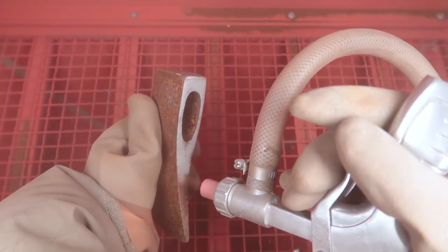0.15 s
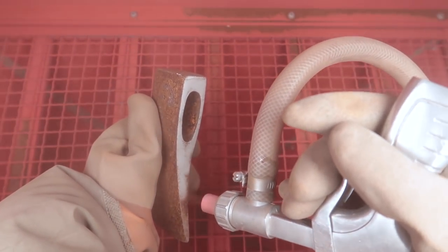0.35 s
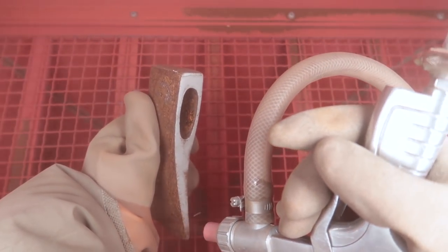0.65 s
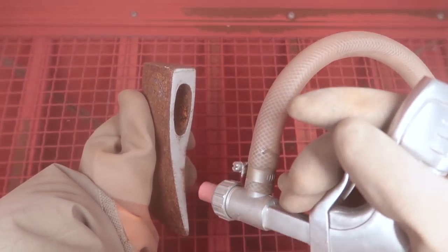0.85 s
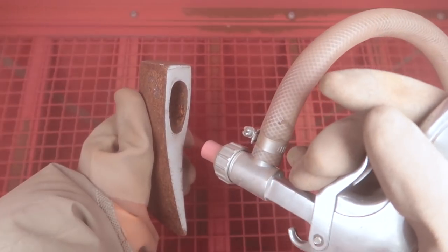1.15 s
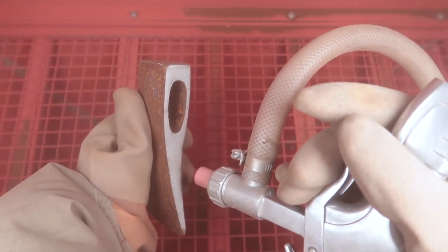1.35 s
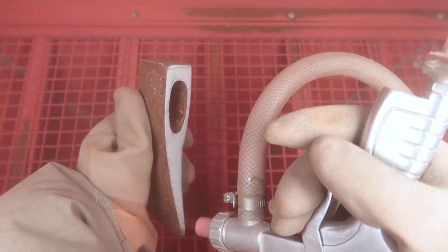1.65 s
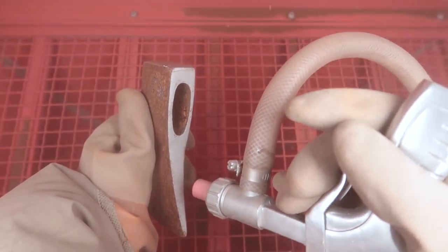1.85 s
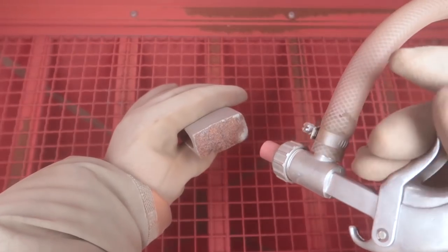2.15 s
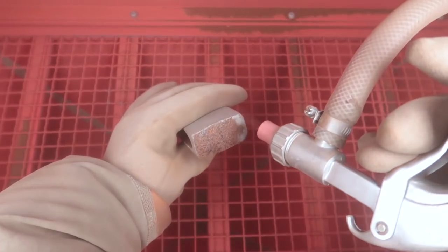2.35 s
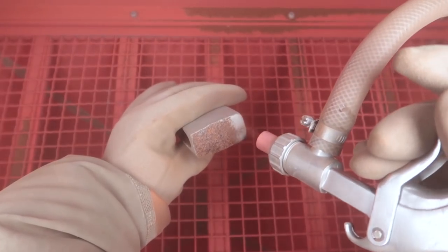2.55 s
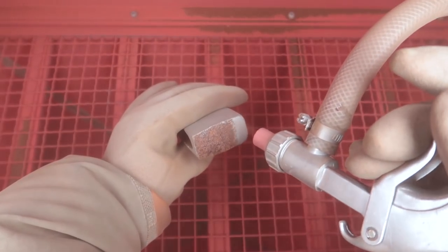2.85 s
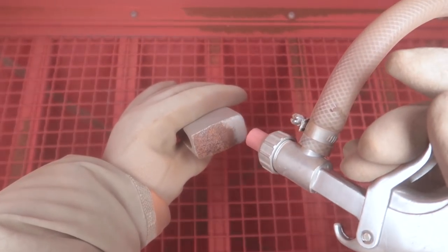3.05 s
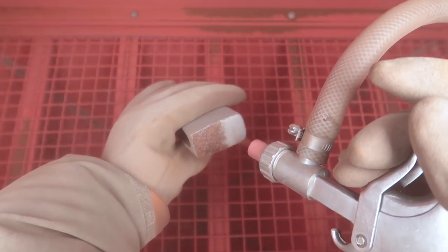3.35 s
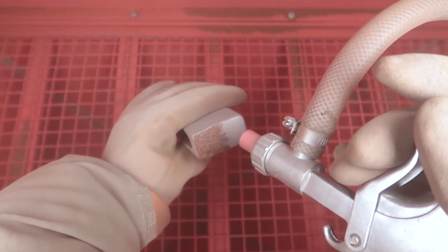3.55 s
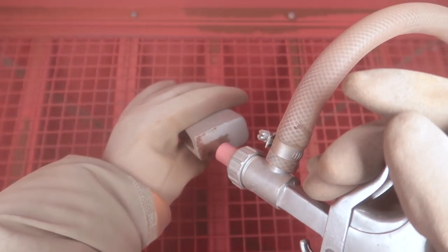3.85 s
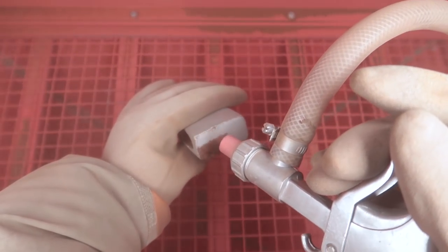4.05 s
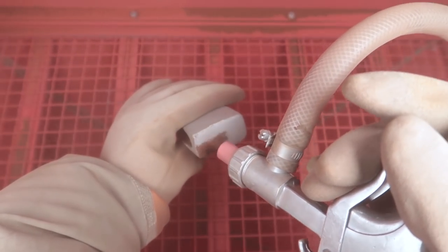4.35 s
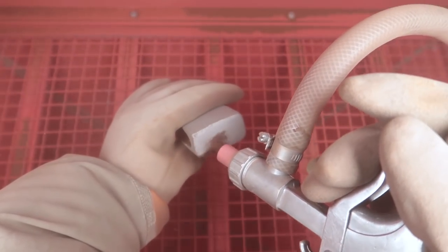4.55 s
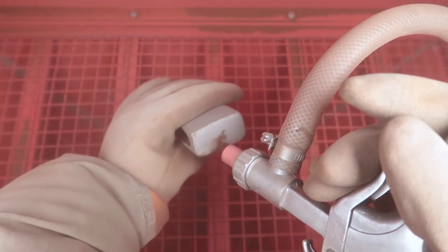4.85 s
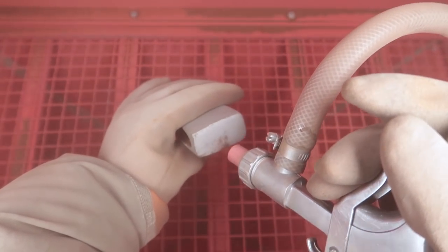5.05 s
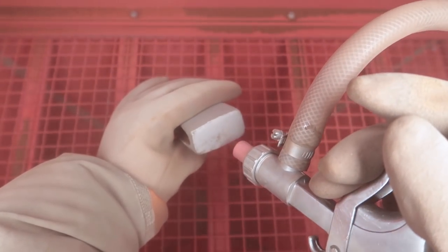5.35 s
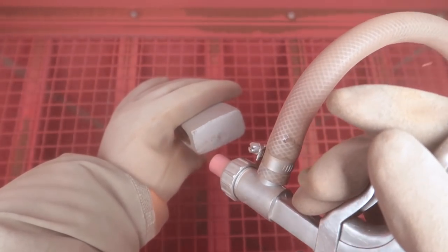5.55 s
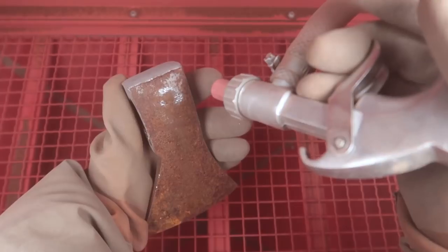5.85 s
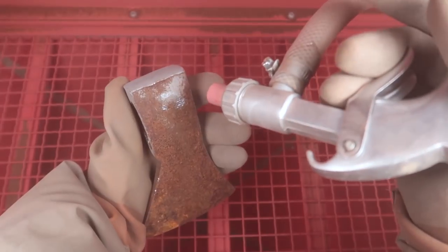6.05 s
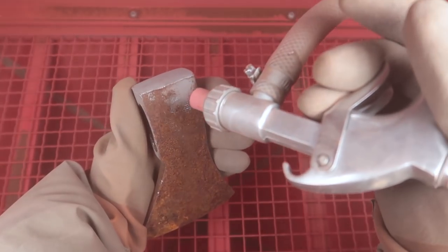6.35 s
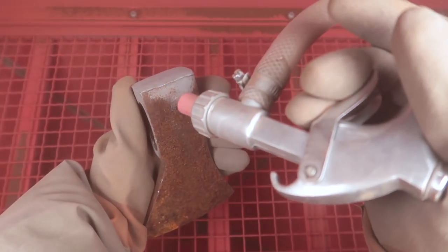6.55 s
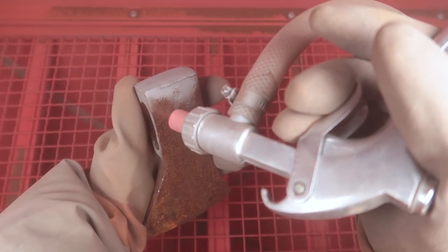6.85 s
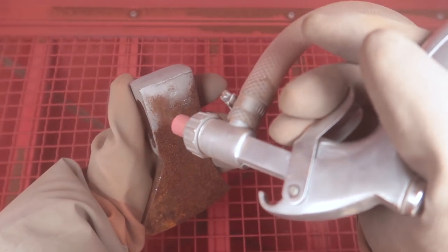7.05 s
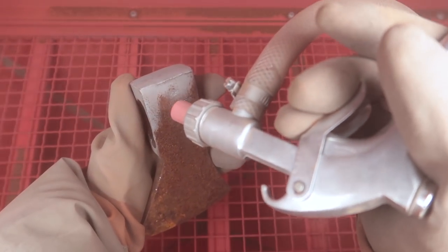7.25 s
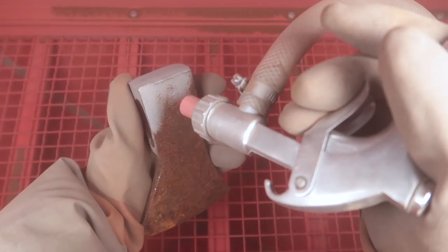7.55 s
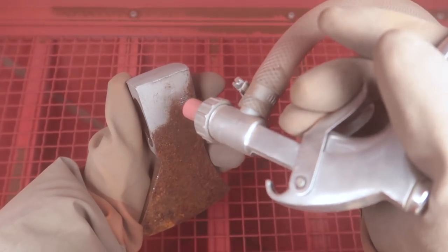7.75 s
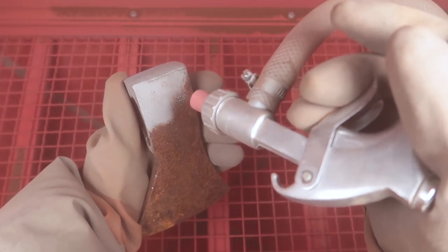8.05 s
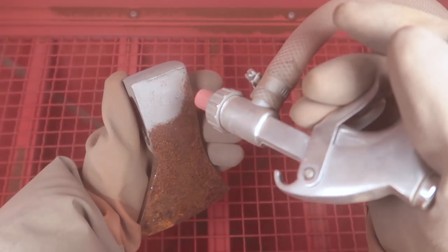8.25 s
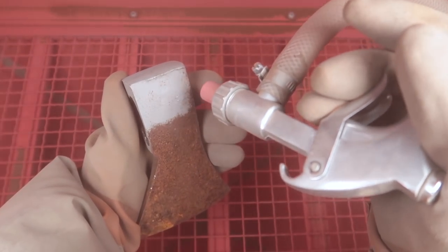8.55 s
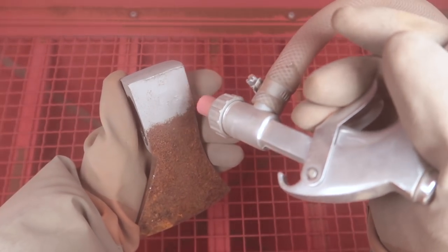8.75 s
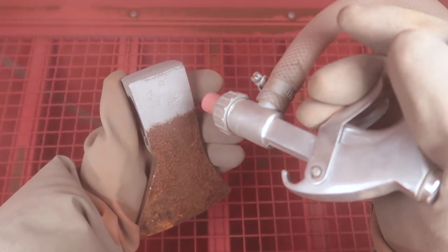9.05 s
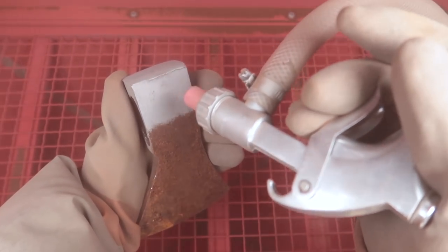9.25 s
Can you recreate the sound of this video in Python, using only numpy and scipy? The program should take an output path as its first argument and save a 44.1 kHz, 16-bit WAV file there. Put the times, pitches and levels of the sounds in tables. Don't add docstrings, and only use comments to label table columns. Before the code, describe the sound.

A blasting gun hisses steadily in a metal cabinet over a humming compressor and thin extractor whine, dropping slightly in level past the middle.

```python
import sys
import numpy as np
from scipy import signal
from scipy.fft import rfft, irfft, next_fast_len
from scipy.io import wavfile

SR = 44100
rng = np.random.default_rng(int(sys.argv[2]) if len(sys.argv) > 2 else 0)


def elevation(decibels):
    levels = np.asarray(decibels, float)
    return 10 ** (levels / 20)


def transcribe(u):
    v = np.clip(np.atleast_2d(u).T, -1, 1)
    q = np.round(v * 32767).astype(np.int16)
    wavfile.write(sys.argv[1], SR, q)


N = 414981
TIME_S = np.arange(N) / SR
SIZE = next_fast_len(N)
HZ = np.maximum(np.arange(SIZE // 2 + 1) * SR / SIZE, 1)


def in_time(rows):
    s, *columns = np.transpose(rows)
    return [np.interp(TIME_S, s, column) for column in columns]


def at_hz(points, hz):
    table_hz, table_db = np.array(points).T
    return np.interp(np.log(hz), np.log(table_hz), table_db)


def drift(rate_hz):
    every = 40
    r = np.exp(-2 * np.pi * every * rate_hz / SR)
    noise = rng.standard_normal(N // every + 2002)
    slow = signal.lfilter([1], [1, -2 * r, r * r], noise)[2000:]
    return np.interp(np.arange(N) / every, np.arange(len(slow)), slow / slow.std())


def swell(s, half_s):
    return np.exp(-np.abs((TIME_S - s) / half_s) ** 3)


def peak(hz, width_hz):
    return 1 / (1 + (2 * (HZ - hz) / width_hz) ** 2)


def through(hz, top):
    top_hz, width_hz, top_db = top
    return top_db - 10 * np.log10(1 + (2 * (hz - top_hz) / width_hz) ** 2)


def slope(hz, order):
    return 1 / (1 + (hz / HZ) ** order)


def resonant(base, modes):
    lift = sum(elevation(2 * db) * peak(hz, width_hz) for hz, width_hz, db in modes)
    return elevation(2 * at_hz(base, HZ)) * (1 + lift)


def dense_modes(ripple_db, spacing_hz):
    knots = np.arange(0, SR / 2, spacing_hz)
    ripple = np.interp(HZ, knots, rng.standard_normal(len(knots)))
    return elevation(2 * ripple_db * ripple)


def lead(seconds):
    return np.exp(1j * np.pi * HZ * seconds * np.array([[-1], [1]]))


def stereo_noise(power):
    # pitch_hz, side_minus_mid_db
    unlike = [(60, -60), (240, -60), (330, -32), (800, -27), (1150, -17), (1300, -18), (1450, -45),
              (2000, -40), (2300, -11), (4000, -15), (5200, -12.5), (6000, -18), (7000, -13), (13000, -2)]
    mid, side = rfft(rng.standard_normal((2, SIZE))) * np.sqrt(power * SR / 2)
    shared = mid * lead(9e-6)
    unshared = elevation(at_hz(unlike, HZ)) * side * [[1], [-1]]
    return irfft(shared + unshared, SIZE)[:, :N]


def tone(turns, level_db, wobble_db):
    level = np.sqrt(2) * elevation(level_db + wobble_db * drift(0.89))
    return level * np.cos(2 * np.pi * turns)


def workshop():
    # start_s, pitch_hz, level_db
    far_motor = [(0, 181, -95), (3.2, 180, -90), (3.5, 178, -72), (4.0, 172, -70), (4.3, 150.1, -64),
                 (4.55, 138, -74), (4.8, 130, -95), (9.41, 130, -95)]
    # start_s, peak_db
    bumps = [
        (2.2, -66),
        (5.02, -70),
        (6.0, -68),
    ]
    hz, level_db = in_time(far_motor)
    out = tone(np.cumsum(hz) / SR, level_db, wobble_db=6.0)
    age = np.arange(SR // 4) / SR
    thump = age / 0.018 * np.exp(1 - age / .02) * np.sin(2 * np.pi * 66 * age)
    for s, db in bumps:
        first = round(s * SR)
        out[first:first + len(age)] += elevation(db) * thump
    return out


def extractor():
    # start_s, whine_hz (60 x shaft speed)
    speed = [(0, 14955), (1.56, 14949), (1.8, 14920), (2.38, 14920), (2.8, 14935), (3.55, 14928),
             (4.06, 14950), (4.3, 14996), (4.94, 14997), (5.2, 14912), (5.75, 14894), (5.94, 14879),
             (6.46, 14871), (6.6, 14833), (6.95, 14807), (7.2, 14852), (7.66, 14868), (9.41, 14872)]
    # multiple_of_shaft_speed, level_db (rms)
    shaft_orders = [(1, -63), (10, -59.5), (15, -59.5), (55, -68)]
    # whine_hz on top, width_hz, top_db
    whine_top = (14930.0, 150, -40.5)
    blade_top = (15010.0, 230, -42.5)
    vane_top = (14888.0, 53, -55.5)
    hz, = in_time(speed)
    turns = np.cumsum(hz / 60 * (1 + .0001 * drift(15.4))) / SR
    weak_orders = sum(tone(k * turns, db, wobble_db=1.5) for k, db in shaft_orders)
    blades = tone(5 * turns, through(hz, blade_top), wobble_db=0.3)
    vanes = tone(45 * turns, through(hz, vane_top), wobble_db=1.5)
    whine_db = through(hz, whine_top) + 1.0 * drift(14.0)
    whine = tone(60 * turns, whine_db, wobble_db=.3)
    return weak_orders + blades + vanes + whine


def compressor():
    # start_s, pitch_hz (16th stroke harmonic)
    stroke = [(0, 1840), (.4, 1841.5), (1.93, 1842.3), (1.99, 1836), (2.7, 1837), (3.6, 1839), (4.4, 1843),
              (4.9, 1843), (5.2, 1840), (6.3, 1839), (6.7, 1836), (7.2, 1837.5), (9.41, 1840)]
    # multiple_of_stroke_rate, level_db (rms)
    stroke_orders = [(1, -61), (2, -50.5), (3, -53.5), (5, -52.5), (7, -47), (8, -45.5), (9, -50),
                     (10, -59.5), (11, -57), (12, -59), (13, -64.5), (15, -47), (16, -46.5), (17, -55.5),
                     (22, -61), (23, -70), (24, -56), (25, -55.5), (26, -61), (28, -64), (29, -77),
                     (30, -58)]
    # top_hz, width_hz, top_db
    stroke_top = (1843.5, 7.0, -43)
    hz, = in_time(stroke)
    turns = np.cumsum(hz / 16 * (1 + 0.00028 * drift(3.13))) / SR
    smear = rng.normal(-.1, .09, len(stroke_orders))
    out = np.zeros(N)
    for (k, db), shift in zip(stroke_orders, smear):
        level_db = through(hz, stroke_top) if k == 16 else db
        out += tone(k * turns + shift, level_db, wobble_db=0.53 + 0.05 * k)
    return out


def cabinet_roar(turbulence):
    # pitch_hz, level_db (per Hz)
    panel_base = [(25, -103.4), (60, -100.5), (100, -97.0), (160, -87), (300, -86), (500, -78.5),
                  (650, -83), (950, -75.5), (1050, -91), (1480, -77), (1560, -86), (2000, -81.5),
                  (3000, -82.5), (4200, -83.1)]
    # pitch_hz, width_hz, lift_db over the base
    panel_modes = [(138, 11, 6), (350, 8.1, 13), (399, 15, 10.5), (444, 16, 4.5), (616.6, 7.3, 18),
                   (647, 12, 19), (682, 28, 18.5), (759, 27, 20.0), (909, 20.7, 19.0), (1066, 25, 20.0),
                   (1145, 16, 16.5), (1150, 108, 17.5), (1470, 16, 6.5), (1615, 26, 13.5), (1630, 16, 6),
                   (1752, 77, 12.5), (1914, 12, 10.5), (2212, 24, 9), (2270, 18, 2.5), (2420, 31, 4.9),
                   (2484, 33, 8.5), (2700, 19, 2), (2770, 42, 3.5), (2973, 53, 7), (3230, 25, 6),
                   (3240, 15, 6), (3386, 58, 5.5), (3740, 105, 5.5), (3880, 68, 8)]
    power = resonant(panel_base, panel_modes) * dense_modes(ripple_db=0.65, spacing_hz=21.64)
    power = power * (1 - slope(4150, order=30))
    return elevation(0.62 + 0.58 * turbulence) * stereo_noise(power)


def whistles():
    # start_s, level_db
    lock = [(0, -56), (.74, -52), (1.2, -61), (1.85, -57), (2.24, -55), (3.16, -55), (3.45, -60),
            (4.4, -51), (4.95, -53), (5.5, -62), (5.88, -57), (6.16, -60), (6.9, -53), (7.2, -54),
            (7.8, -60), (8.16, -56), (8.4, -55), (9.41, -58)]
    # pitch_hz, width_hz
    stages = [
        (9743, 30),
        (9626, 28),
        (5219, 30),
    ]
    drop_s, glide_s, left_db = 5.26, .15, -6
    lock_db, = in_time(lock)
    fallen = .5 + .5 * np.tanh((TIME_S - drop_s) / glide_s)
    upper_db = lock_db + left_db * fallen
    lower_db = lock_db + 1.5 * left_db * (1 - fallen)
    hose_db = -54.5 + 3.5 * fallen + .25 * (lock_db - lock_db.mean()) + .8 * drift(4.4)
    out = 0
    for db, (hz, width_hz) in zip((upper_db, lower_db, hose_db), stages):
        out = out + elevation(db + 2.0) * stereo_noise(peak(hz, width_hz) ** 2 / width_hz)
    return out


def grit_clumps():
    # start_s, level_db
    clumps = [
        (1.262, -45),
        (1.288, -42),
        (1.303, -41),
    ]
    spits = sum(elevation(db) * np.exp(-((TIME_S - s) / 0.011) ** 2) for s, db in clumps)
    ring = peak(6000, 450) ** 2 + .2 * peak(7400, 900) ** 2
    ring = ring + .35 * peak(8900, 300) ** 2 + .2 * peak(11000, 200) ** 2
    return spits * stereo_noise(ring / 550)


def splash(feed_db):
    # start_s, half_length_s, level_db
    splashes = [(.54, .05, -47), (1.16, .05, -51), (1.265, .055, -46), (2.26, .07, -50),
                (4.916, .045, -44.5), (5.38, .04, -51), (5.64, .04, -46), (6.06, .05, -50),
                (6.957, 0.073, -41), (7.12, .09, -42), (7.5, .09, -45), (8.65, .05, -48), (9.14, .07, -44)]
    turned_s, edge_db, face_db = 5.915, -52, -49.5
    steady_db = np.where(TIME_S < turned_s, edge_db, face_db)
    steady_db = steady_db + 2.0 * feed_db.clip(None, 0)
    landings = sum(elevation(2 * db) * swell(s, half_s) for s, half_s, db in splashes)
    aim = np.sqrt(elevation(2 * steady_db) + landings)
    return aim * elevation(1.4 * drift(30)) * stereo_noise(peak(5740, 780) ** 2 / 700)


def jet(turbulence):
    # start_s, half_length_s, change_db
    surges = [(0.0, .06, 1), (.25, .05, 1.2), (1.17, .12, 1.5), (1.285, .04, 2.5), (1.45, .08, 2),
              (2.07, 0.11, -1.5), (2.287, .08, 2.5), (3.47, 0.089, 0), (3.85, 0.091, -1), (4.3, .06, 0),
              (4.53, .12, -0.5), (5.7, 0.11, 0.5), (5.97, .05, -1.8), (6.07, .05, 1.5), (6.28, .05, -2),
              (6.39, .05, 1.6), (7.05, 0.18, 2.8), (7.47, .08, 1.5), (9.0, .05, -1), (9.15, .09, 1.4)]
    # pitch_hz, level_db (per Hz)
    jet_base = [(4200, -83.5), (5000, -80.3), (6000, -82), (6500, -81.3), (8000, -82.3), (9400, -84.8),
                (11000, -82.9), (11500, -85.9), (13000, -86.3), (14200, -84.6), (15000, -84),
                (15650, -84.3)]
    # pitch_hz, width_hz, lift_db over the base
    jet_modes = [(4257, 40, 5), (4367, 32, 3.3), (4449, 54, 7.8), (4536, 26, 10), (5298, 32, 5.5),
                 (8198, 47, 2.5), (9015, 70, 3.5), (9968, 32, 2.5), (10317, 75, 2.1), (10510, 40, 2),
                 (14759, 360, 2.2)]
    feed_db = sum(db * swell(s, half_s) for s, half_s, db in surges)
    power = resonant(jet_base, jet_modes) * dense_modes(ripple_db=1.0, spacing_hz=38.7)
    power = power * slope(4190, order=30)
    body_share = 1 - slope(6200, order=16)
    top_share = slope(10600, order=24)
    hiss_share = (1 - body_share - top_share).clip(0)
    body = elevation(0.65 + 0.66 * turbulence) * stereo_noise(power * body_share)
    hiss = elevation(1.5 + feed_db + 0.81 * turbulence) * stereo_noise(power * hiss_share)
    top = elevation(-0.5 + 1.4 * feed_db + 1.0 * turbulence) * stereo_noise(power * top_share)
    return body + hiss + top + splash(feed_db) + whistles()


def scene():
    turbulence = 0.59 * drift(7.0) + .5 * drift(40)
    machines = workshop() + extractor() + compressor()
    tones = irfft(rfft(machines, SIZE) * lead(12e-6), SIZE)[:, :N]
    return tones + cabinet_roar(turbulence) + grit_clumps() + jet(turbulence)


def top_cut(x):
    return signal.sosfilt(signal.butter(12, 15720, fs=SR, output="sos"), x)


def record(dry):
    # start_s, gain_db
    gain = [
        (0, 0),
        (5.913, 0),
        (5.917, -4.5),
        (9.41, -4),
    ]
    # pitch_hz, left_minus_right_db
    balance = [(60, 0), (2380, 0), (4400, -.6), (8120, -1.1), (15000, -1.6)]
    gain_db, = in_time(gain)
    rounded = .25 * np.tanh(dry / .25) * elevation(gain_db)
    shade = elevation(at_hz(balance, HZ) * np.array([[.6], [-.6]])) * (HZ < 15725)
    heard = irfft(rfft(rounded, SIZE) * shade, SIZE)[:, :N]
    return top_cut(heard)


dry = scene()
out = record(dry)
transcribe(out)
```